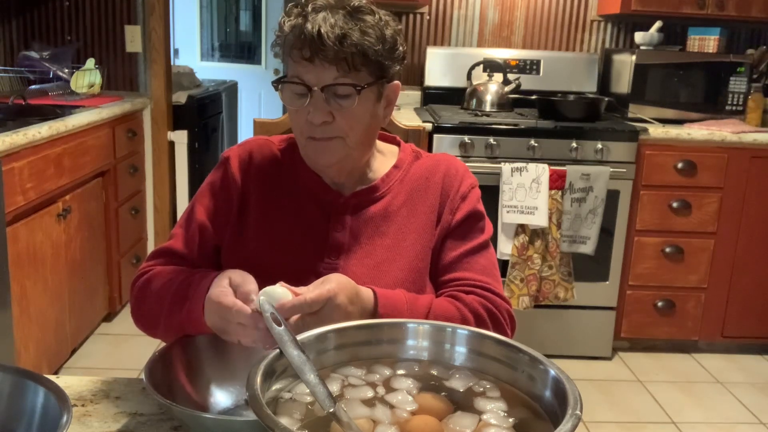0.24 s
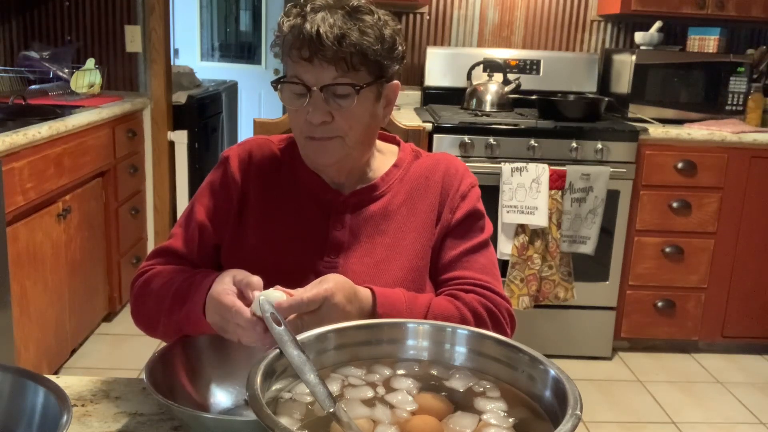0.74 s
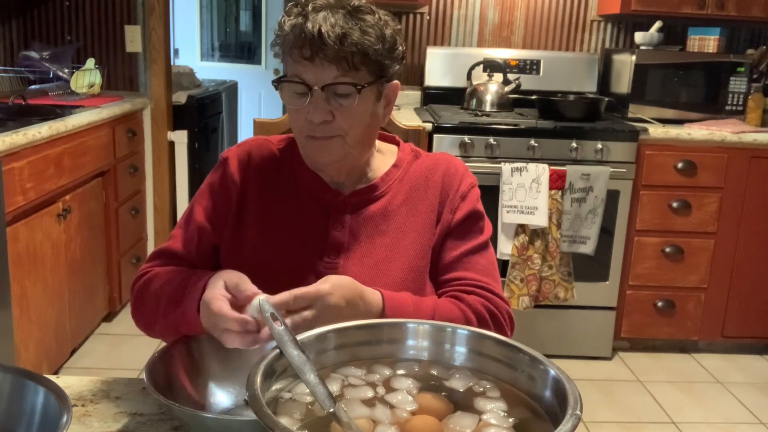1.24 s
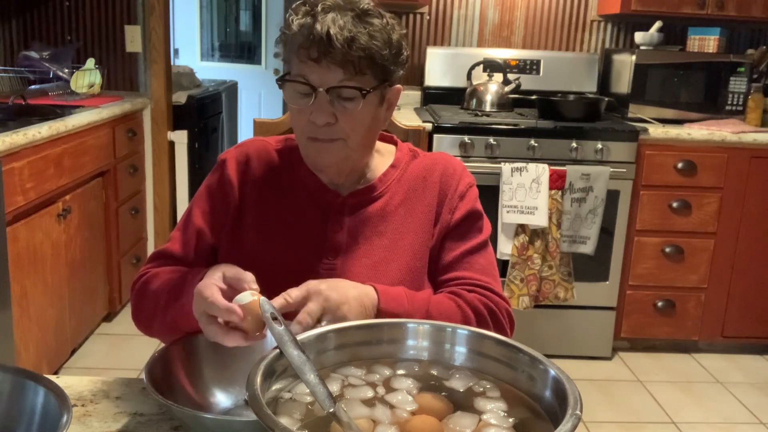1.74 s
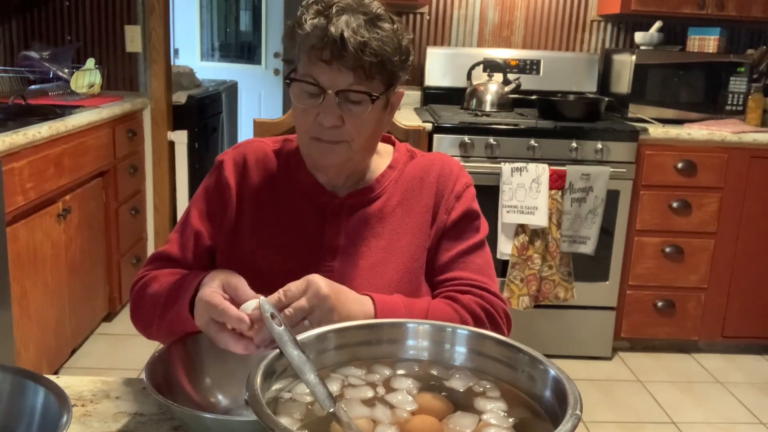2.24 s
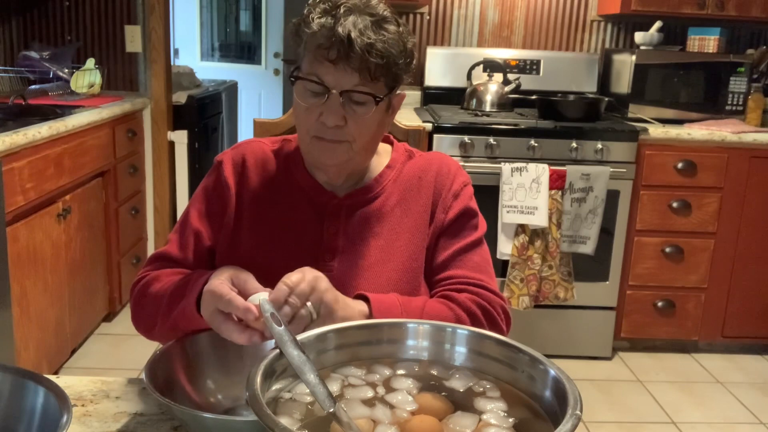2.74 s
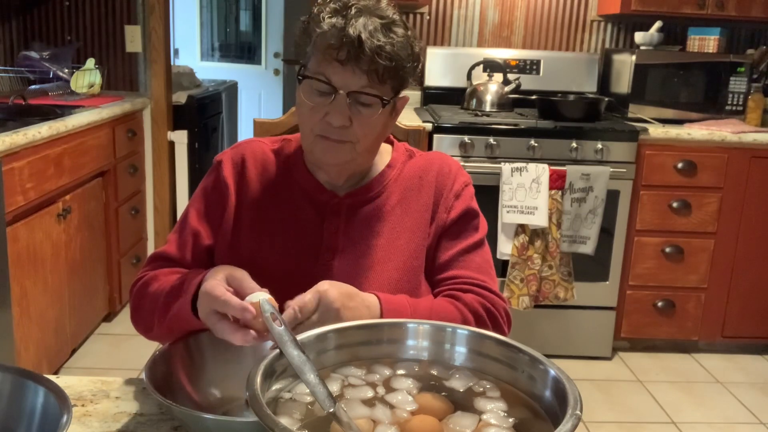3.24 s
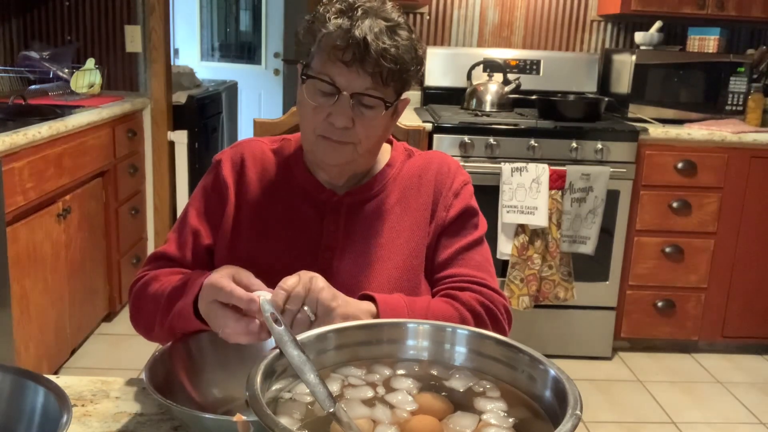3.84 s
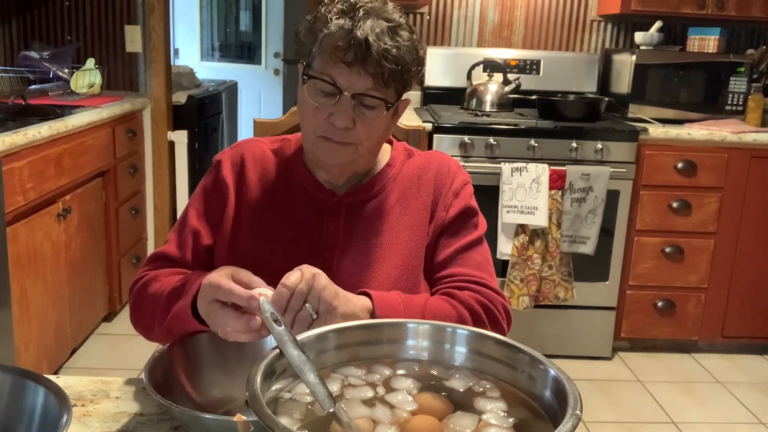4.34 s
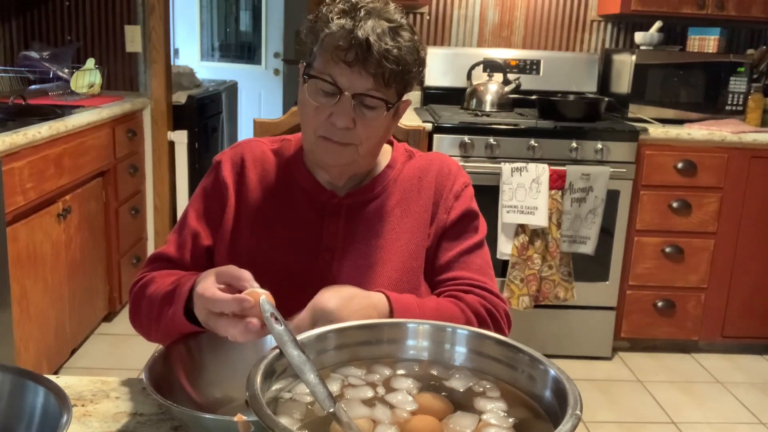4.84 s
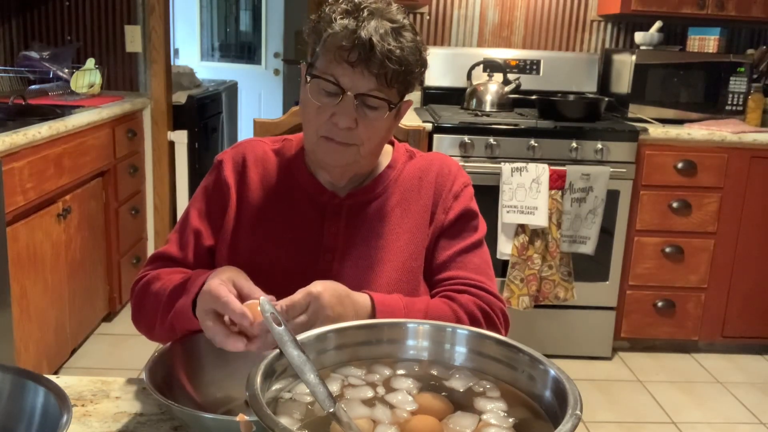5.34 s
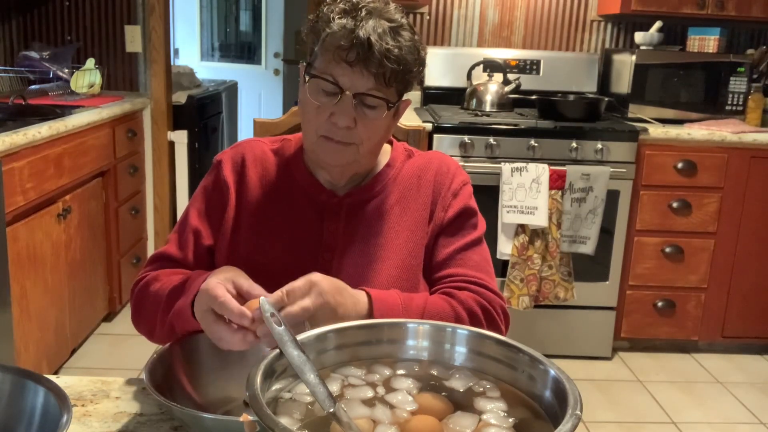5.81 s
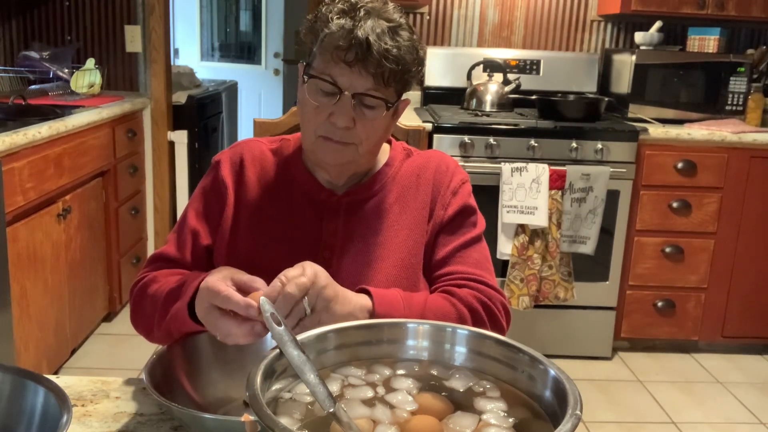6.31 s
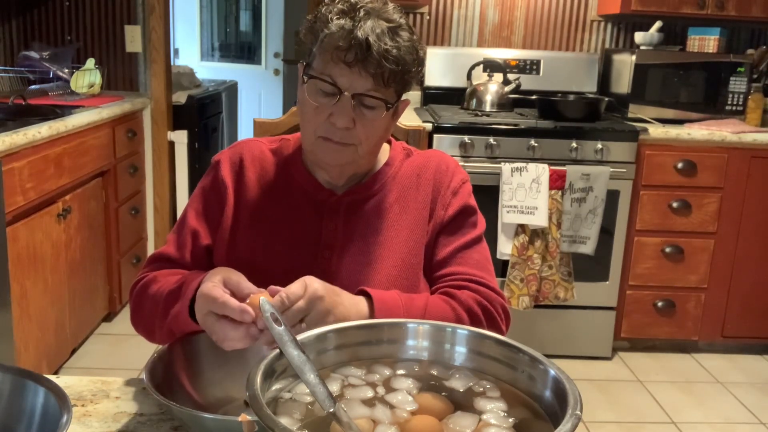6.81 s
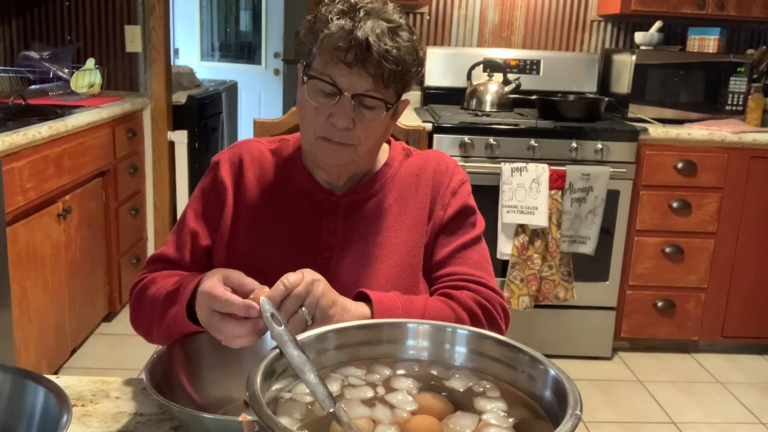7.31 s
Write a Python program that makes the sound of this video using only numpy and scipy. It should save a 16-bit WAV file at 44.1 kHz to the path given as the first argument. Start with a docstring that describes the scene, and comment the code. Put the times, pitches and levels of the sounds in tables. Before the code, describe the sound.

A steady low hum and soft fan rush fill a tiled kitchen. Nearby, fingers break and peel eggshell, giving short crisp snaps, gritty crumbles and a barely audible wet rub. The strongest double crack comes early, bright clinks follow before the middle, then a crackling cluster and one hard snap. Dull little bowl knocks appear between them, and the ending is a busy run of light ticks. Close stereo pickup, short room reverberation.

```python
"""The shell of a hard-boiled egg cracks and peels under the fingers, over steel bowls on a kitchen table.
Each snap is a short run of tiny fractures, an impulsive source that excites the modes of a shell flake.
Shell also crumbles, its membrane ticks, a thumb rubs the wet egg and large plates of shell ring briefly.
Knocks excite a bowl's damped modes; midway come bright clinks, strong short partials and faint lingering ones.
A tiled kitchen reverberates, over the wavering tones of an appliance and the low rush of a fan."""
import sys
import numpy as np
from scipy import signal
from scipy.fft import rfft, irfft, next_fast_len
from scipy.io import wavfile
from scipy.ndimage import uniform_filter1d

SR = 44100
rng = np.random.default_rng(int(sys.argv[2]) if len(sys.argv) > 2 else 0)


def generate_wav(sig):
    """Save sig (samples, or channels by samples) to the path in sys.argv[1] as 16-bit PCM at SR."""
    pcm = np.round(np.clip(np.atleast_2d(sig).T, -1, 1) * 32767).astype(np.int16)
    wavfile.write(sys.argv[1], SR, pcm)


N = 333837

# Shell snaps: [t/s, energy over 1 ms/dB, energy decay time of the tear/s, flake pitch f/Hz,
# flake ring level/dB, egg body level/dB, treble tilt/dB per octave]
SNAPS = [(0.152, -43.5, 0.00064, 8200, 10, -4, 2), (0.203, -26.5, 0.0038, 6150, -9, -3.5, 10.5),
         (0.436, -46, 0.019, 11500, 1, -20, 4), (0.7602, -37, 0.0015, 5000, 2, -12, -12),
         (0.7672, -37, 0.00059, 4260, 7, -7, -17), (0.772, -34.5, 0.009, 5200, 6, -8, -16),
         (0.7873, -29.5, 0.004, 5200, 0, -9, -10.5), (0.7943, -33.5, 0.0016, 6600, 14, -8, -3),
         (0.801, -38, 0.0012, 6700, 3, -12, 2), (1.085, -39, 0.0075, 9550, -3, -16.5, -3.5),
         (1.466, -43.5, 0.0013, 7950, 6, -0.5, 10), (1.7809, -27, 0.0012, 3250, 16, -8, 2),
         (1.7811, -21, 0.0023, 6600, -8, -15, -5.5), (1.8342, -21.5, 0.0022, 6700, -5, -12, -4),
         (2.094, -62.5, 0.002, 6500, -4, -20, -19.5), (2.45, -48, 0.0042, 6540, -11, -11, -12),
         (2.6005, -33, 0.0015, 4900, 5, -6, -21), (2.61, -37, 0.0047, 2300, 0, -17, -5),
         (2.7468, -27.5, 0.0009, 9600, -2, -18.5, -4), (2.7474, -31, .002, 5830, -1.5, -20, -3),
         (2.776, -48, 0.0018, 9600, -2, -4, 2), (3.3169, -38, 0.004, 7080, -11, -17, -16),
         (3.3518, -30.5, 0.0034, 7300, -15, -20, -14.5), (3.8032, -31.5, 0.0023, 6000, -17, -15, -2.5),
         (4.077, -53, 0.0013, 10100, 2.5, -6, -12), (4.137, -33.5, 0.0011, 5030, 7.5, -13, 6.5),
         (4.1515, -43, 0.0013, 5000, 15, 2, -14), (4.365, -36.5, 0.00067, 4400, 7, 3.5, -2),
         (4.373, -44, 0.0016, 2000, 7, -5, -13), (4.386, -44, 0.0019, 3370, 10, -8, -17),
         (4.395, -50, 0.00093, 3300, 6, -6, -12), (4.4347, -34, 0.0016, 5260, 9, -10, -16),
         (4.4345, -33, .001, 8920, 9, -20, 4), (4.4398, -41, .0008, 5400, 12, -12, 1),
         (4.4465, -43, .001, 5370, 10, -10, -1), (4.524, -35, 0.0016, 5760, -7, -15.5, -4),
         (4.524, -35, 0.0018, 9300, 7, -21, 12), (4.5308, -43.5, 0.0019, 9350, -3, -11, -4),
         (4.545, -48, .003, 12500, -6, -8, 4.5), (5.0096, -17.5, 0.0078, 7290, -15, -24.5, -5.5),
         (5.825, -42, 0.0034, 8630, -14, -23, -6.5), (6.044, -37, 0.00098, 6420, -18, -27, -18.5),
         (6.1523, -48, 0.0021, 6660, -10, -21, -22.5), (6.2134, -38, 0.0035, 9600, -3, -5, -4.5),
         (6.224, -47.5, 0.0053, 2600, 12, -14, -8), (6.6303, -53.5, 0.0021, 11550, 7.5, -12, -13.5),
         (6.8288, -60.5, .001, 7540, -10, -8, 9), (6.8533, -41, 0.0015, 10010, 21, -15.5, 0),
         (6.929, -39.5, 0.0039, 8660, 9, -20, -11), (6.952, -49.5, 0.0018, 4600, -4, -19, -16),
         (7.0366, -48, 0.004, 5500, -11, -16, 4), (7.047, -48, .004, 5500, -13, -21, 3),
         (7.074, -50, .001, 5500, -6, -7, 4), (7.0824, -43, 0.0048, 8600, 5, -16, -8),
         (7.1, -33, 0.00078, 12000, -3, -18, 10), (7.1369, -45, .0015, 6000, -8, -15, 9),
         (7.164, -42, 0.0036, 5500, -9, -15, 7), (7.176, -40, 0.0082, 11900, 4, -19, -8),
         (7.186, -39.5, 0.0079, 5110, 5.5, -6, 6.5), (7.335, -43.5, 0.005, 9030, 13, -1, 0),
         (7.4242, -58.5, .0015, 9890, -2, -14, 1), (7.4706, -44, 0.0027, 5000, -3, -6, 3),
         (7.4856, -35.5, 0.0025, 5050, 18, -7, -6.5)]
FLAKE_DAMPING = 0.18  # width of a flake's modes as a share of their pitch


def amp(db):
    """Level to amplitude ratio: 20 dB for each factor of ten."""
    return 10 ** (np.asarray(db) / 20)


def read(points, hz):
    """Linear interpolation of a tabulated spectrum on a logarithmic frequency axis."""
    f, value = np.transpose(points)
    return np.interp(np.log(hz + 1), np.log(f + 1), value)


def unit(x):
    """Normalization to unit energy, the sum of squares."""
    return x / np.sqrt(np.sum(x ** 2) + 1e-20)


def add(mix, s, sound):
    """Superposition: a sound adds linearly to the mix from time s."""
    part = mix[max(round(s * SR), 0):][:len(sound)]
    part += sound[:len(part)]


def causal(gain):
    """Minimum phase: the Hilbert transform of log gain gives a response that rings only after the blow."""
    both_sides = np.r_[gain, gain[-2:0:-1]]
    log_gain = np.log(np.maximum(both_sides, 1e-4))
    return np.fft.ifft(np.exp(np.conj(signal.hilbert(log_gain)))).real


def shell():
    """Brittle fracture: strain swells, then a tear excites the flake; returns straight and thrown sound."""
    strain_s, strain_db = 0.0011, -15  # build-up time, energy against the snap
    near, thrown = np.zeros((2, N))
    one_ms = np.sqrt(SR / 1000)
    for s, db, length, pitch_hz, ring_db, body_db, tilt_db in SNAPS:
        ring = flake(pitch_hz, damping_of(db), ring_db, body_db, tilt_db)
        strain = tear(strain_s)[::-1]  # a dying run reversed in time swells
        strain_start = s - len(strain) / SR
        for start, run, part_db in [(strain_start, strain, strain_db), (s, tear(length), 0)]:
            sound = amp(db + part_db) * one_ms * unit(np.convolve(run, ring))
            add(near, start, sound)
            add(thrown, start, sound * amp(cupped_db(s)))
    return near, thrown


def tear(length, fractures_per_s=7000, first_db=3, spread_db=4, clump_db=3.5, clump_s=0.001,
         evenness=0.45, order=160, size=2600):
    """Random impulse train: a break sets off dying, clumped fractures, partly whitened to excite all pitches."""
    chance, strength, sign = rng.random((3, size))
    t = np.arange(size) / SR
    clumps = np.interp(t / clump_s, np.arange(size), rng.standard_normal(size))
    fractures = (chance < fractures_per_s / SR) * np.sign(sign - 0.5)
    run = fractures * amp(spread_db * (2 * strength + 2) + clump_db * clumps)
    run[0] = amp(first_db)
    run = run * np.exp(-t / (2 * max(length, 1e-4)))
    power = uniform_filter1d(abs(rfft(unit(run))) ** 2, size=21) + 1e-3
    whitener = causal(power ** (-evenness / 2))[:order]
    return signal.fftconvolve(run, whitener)[:size]


def flake(pitch_hz, damping, ring_db, body_db, tilt_db, second=1.9, second_db=-3, third=2.3, third_db=-5,
          edge=0.63, body_hz=5000, low_hz=900, tilt_hz=7000, size=1024):
    """Modal resonance: three bending modes, little radiation below the first, and the egg's dull body."""
    hz = np.fft.rfftfreq(size, 1 / SR) + 1
    ratio = hz / pitch_hz
    treble = amp(tilt_db * np.log2(np.maximum(hz / tilt_hz, 1))) ** 2

    def mode(k, db):
        """Resonance curve: power response at k times the pitch."""
        return (amp(ring_db + db) / (1 + ((ratio / k - 1) / damping) ** 2)) ** 2

    upper = mode(second, second_db) + mode(third, third_db)
    modes = mode(1, 0) + upper * np.minimum(treble, 1)  # a soft break hardly wakes the upper modes
    crack = treble / (1 + ratio ** -12)
    radiates = 1 / (1 + (edge / ratio) ** 24)
    body = amp(body_db) ** 2 / (1 + (hz / body_hz) ** 4) / (1 + (low_hz / hz) ** 4)
    return causal(np.sqrt((modes + crack) * radiates + body))


def damping_of(db, firm_db=-34, halving_db=21):
    """Damping: a snap above firm_db frees its flake, and the modes narrow by half every halving_db."""
    return FLAKE_DAMPING * 2 ** (-max(db - firm_db, 0) / halving_db)


def cupped_db(s):
    """Shielding: hands cupping the egg send more of its sound round by the room."""
    # Course of the cupping: [t/s, room against straight sound level/dB]
    cupping = [(.2, -6), (1.8, -4), (2.6, -4.5), (2.75, 2.5), (3.35, 1.5), (3.8, 1.5), (4.14, -3), (4.4, 1),
               (4.55, -1.5), (6, -3), (7.3, -9), (7.5, -3)]
    return np.interp(s, *np.transpose(cupping))


def crumbs(per_s=170, tear_s=0.0006, scatter_db=3, scatter_octaves=0.21, swell_db=6, ring_db=3,
           body_db=-14, tilt_db=-4, room_db=1):
    """Repeated small fracture: flakes break off unevenly along each pull; returns straight and thrown sound."""
    # The thumb pulls strips of shell away: [start t/s, end t/s, typical crumb energy at the end over 1 ms/dB,
    # median crumb pitch f/Hz]; an end ahead of the start gives one crumb between the two
    pulls = [(0.168, 0.19, -47, 8150), (0.735, 0.75, -46.5, 4440), (0.949, 1.01, -63, 10400),
             (1.421, 1.54, -70, 10600), (1.772, 1.896, -42.5, 3160), (2.457, 2.48, -45, 2700),
             (2.588, 2.56, -49, 4217), (4.4, 4.432, -53, 4200), (4.504, 4.519, -46.5, 9400),
             (6.933, 6.8, -56, 4500), (7.071, 6.34, -47.5, 10430), (7.43, 7.6, -49.5, 9470),
             (7.48, 7, -46, 4870)]
    near, thrown = np.zeros((2, N))
    one_ms = np.sqrt(SR / 1000)
    for start, end, db, pitch_hz in pulls:
        count = max(round((end - start) * per_s), 1)
        for k in range(count):
            along = (k + rng.random()) / count
            loud, small = rng.standard_normal(2)
            s = start + along * (end - start)
            crumb_hz = pitch_hz * 2 ** (scatter_octaves * small)
            ring = flake(crumb_hz, FLAKE_DAMPING, ring_db, body_db, tilt_db)
            crumb_db = db + scatter_db * loud + swell_db * (along - 1)  # harder towards the end
            crumb = amp(crumb_db) * one_ms * unit(np.convolve(tear(tear_s), ring))
            add(near, s, crumb)
            add(thrown, s, crumb * amp(cupped_db(s) + room_db))
    return near, thrown


def plates(tick_db=-22, tick_s=0.001, tick_hz=7000):
    """Free vibration: large plates of shell spring free and ring briefly, each in its own modes."""
    # Plates: [t/s, level/dB, modes as (f/Hz, relative level/dB, t60/s)]
    pieces = [(0.2035, -52, [(4000, -3, .04), (6000, 3, .04)]), (1.781, -32, [(1500, -9, .02),
              (2912, -9, .11), (3060, -1, .035), (3230, 3, .018), (3410, 2, .035), (4950, 2, .014),
              (5140, 4, .018), (5380, 0, .014), (6250, -2, .035), (6400, 0, .05), (6800, 2, .018)]),
              (1.835, -41, [(900, -2, .035), (1720, -1, .025), (2020, 1, .03), (2680, -1, .05),
              (3050, -3, .05), (6370, 3, .04)]), (4.435, -45, [(5250, 0, .04), (8900, 8, .06)]),
              (4.5315, -45, [(13300, -2, .03), (14100, 0, .03)]), (4.5455, -47, [(12900, -2, .05),
              (13250, 0, .06)]), (5.011, -33, [(5410, 0, .04), (5620, -2, .025), (5790, -2, .035),
              (6580, 0, .03), (6930, 1, .04), (7040, 0, .06), (8450, 5, .04), (12470, -12, .05),
              (13360, -10, .07)])]
    return sum(struck([(s, db)], modes, tick_db, tick_s, tick_hz, uneven_db=2.5) for s, db, modes in pieces)


def membrane(level_db=-64, ticks_per_s=450, lead_s=0.01, spread_db=4):
    """Random point process: faint ticks of the membrane letting go crowd round snaps, where the thumb presses."""
    t = np.arange(N) / SR
    coarse_t = t[::64]
    nearest_snap = np.min([abs(coarse_t - row[0]) for row in SNAPS], axis=0)
    pressure = np.exp(-nearest_snap / lead_s)
    ticking = rng.random(N) < np.interp(t, coarse_t, pressure) * ticks_per_s / SR
    sizes = amp(spread_db * np.minimum(rng.exponential(1, N), 4)) * rng.choice([-1, 1], N)
    ticks = ticking * sizes * np.interp(t, coarse_t, np.sqrt(pressure))
    ring = unit(flake(6200, 0.15, -2, -18.5, 0))
    return amp(level_db) * signal.oaconvolve(ticks, ring)[:N]


def rub(width_hz=400, grain=0.38, grain_s=0.0048, level_db=-2):
    """Stick-slip friction: skin on wet egg gives a grainy, narrow-band squeak that swells and fades."""
    # Strokes of the thumb: [start t/s, length/s, relative level/dB, pitch f/Hz]
    strokes = [(1.58, 0.21, -86, 6500), (2.11, 0.18, -80.5, 2950), (2.14, 0.056, -76, 6750),
               (2.355, 0.14, -81.5, 3293)]
    out, t = np.zeros(N), np.arange(SR // 2) / SR
    for s, length, db, pitch_hz in strokes:
        slips = np.exp(grain * np.interp(t / grain_s, np.arange(len(t)), rng.standard_normal(len(t))))
        band = signal.butter(2, [pitch_hz - width_hz / 2, pitch_hz + width_hz / 2], "band", fs=SR)
        noise = signal.lfilter(*band, slips * rng.standard_normal(len(t)))
        squeak = np.sqrt(len(t)) * unit(noise)  # rms 1
        stroke = np.sin(np.pi * np.minimum(t / length, 1))
        add(out, s, amp(db + level_db) * stroke * squeak)
    return out


def struck(hits, partials, tick_db, tick_s, tick_hz, uneven_db, contact_s=0.00025):
    """Additive impact: a scratch of contact plus decaying partials that swell in contact and vary with each hit."""
    out, t = np.zeros(N), np.arange(SR * 3 // 4) / SR
    tick_band = signal.butter(1, [700, tick_hz], "band", fs=SR)
    for s, db in hits:
        ring = np.zeros(len(t))
        for hz, partial_db, t60 in partials:
            vary, phase = rng.standard_normal(2)
            envelope = amp(partial_db + uneven_db * vary - 60 * t / t60)
            ring += envelope * np.sin(2 * np.pi * (hz * t + phase))
        ring *= 1 - np.exp(-t / contact_s)
        tick = signal.lfilter(*tick_band, rng.standard_normal(len(t))) * np.exp(-t / tick_s)
        add(out, s, amp(db) * (ring + amp(tick_db) * tick))
    return out


def drops(tick_s=0.0037, spot_db=7, spot_octaves=0.17, away_db=-9):
    """Point excitation: the landing spot decides which bowl modes speak, and a soft touch misses high ones."""
    # Bits of shell and fingers knocking the bowl: [t/s, level/dB, scratch of contact relative level/dB,
    # f/Hz that the landing spot brings out, f/Hz above which a soft touch fades]
    knocks = [(0.4337, -57, 6, 1550, 6000), (.442, -50, 4, 920, 3500), (.466, -59, 2, 1500, 3500),
              (1.2336, -71, 11, 1200, 4000), (3.5429, -49.5, 6, 1300, 2800), (3.552, -54, 2, 1580, 3000),
              (3.695, -56, 0, 1000, 2000), (4.9665, -49.5, 4, 1200, 3200), (5.009, -55, -6, 1100, 2000),
              (5.259, -58, -1, 1230, 1800), (5.4373, -63, 5, 1510, 2500), (6.577, -46, -2, 860, 2200)]
    # Modes of the damped bowl: [f/Hz, relative level/dB, t60/s]
    bowl_modes = [(815, -1, 0.07), (925, -7, 0.12), (1068, -9, 0.05), (1197, -2, 0.09), (1290, -7, 0.04),
                  (1394, -8, 0.047), (1580, -6, 0.11), (1985, -10, 0.07), (2330, -10, 0.1), (2730, -8, .08)]
    out = np.zeros(N)
    for s, db, tick_db, spot_hz, soft_hz in knocks:
        modes = []
        for hz, mode_db, t60 in bowl_modes:
            near_spot = np.exp(-(np.log2(hz / spot_hz) / spot_octaves) ** 2)
            softness_db = -10 * np.log10(1 + (hz / soft_hz) ** 4)
            modes.append((hz, mode_db + away_db + spot_db * near_spot + softness_db, t60))
        out += struck([(s, db)], modes, tick_db, tick_s, soft_hz, uneven_db=1)
    return out


def clinks(level_db=-2.5):
    """Sum of decaying partials: bright clinks of strong short partials and faint thin tones that linger."""
    # Clinks: [t/s, relative level/dB]
    hits = [(3.3172, -55), (3.3525, -41.5), (3.544, -73), (3.697, -78)]
    # Partials of the clinks, strong short ones and faint thin ones that linger: [f/Hz, relative level/dB, t60/s]
    partials = [(1137, -10.5, 0.17), (1550, -14, .08), (1940, -18.5, .2), (2320, -18.5, .2),
                (2890, 1.5, 0.19), (3020, -3, 0.18), (3055, -4.5, 0.11), (3311, -16, .2), (3634, -18, .42),
                (3919, -22, .46), (4183, -23, 0.68), (4424, -24, .6), (4400, -21, .7), (4780, -21, .25),
                (5050, -24, 0.9), (5548, -22, 1.0), (5557, -27, 0.86), (5712, -23, 0.99),
                (6022, -22.5, 1.0), (6033, -24, .8), (6183, -23, 0.86), (6347, -8, 0.18), (6519, 6, 0.12),
                (6520, 6, 0.12), (6750, -4, .17), (6840, -8, .25), (7063, -9, 0.31), (7200, -3, 0.43),
                (7450, -5, .1), (7784, -11, 0.22), (8446, 6.5, 0.2), (8710, 1, 0.14), (8950, 10, .13),
                (9230, 0.5, .14), (9900, 1, 0.15), (10160, 1, 0.16)]
    return amp(level_db) * struck(hits, partials, tick_db=-5, tick_s=0.002, tick_hz=2500, uneven_db=2)


def kitchen(x, ceiling_s=0.0117, ceiling=0.36, count=3, sway_s=1.3):
    """Room reflection: a clear ceiling bounce, and tails that take turns as the hands sway."""
    turn = np.arange(N) / SR / sway_s
    wet = np.zeros((2, N))
    for k in range(count):
        share = np.sqrt(2 / count) * np.cos(np.pi * (turn + k / count))  # squares of the shares sum to 1
        wet += signal.oaconvolve((x * share)[None], tail(), axes=1)[:, :N]
    return wet + ceiling * np.pad(x, (round(ceiling_s * SR), 0))[:N]


def tail(build_s=0.0024, size=22050):
    """Reverberant decay: reflections grow dense in uneven clumps and die at a rate set by frequency."""
    # Kitchen reverberation: [f/Hz, t60/s]
    decay = [(800, 0.19), (2800, 0.32), (6500, 0.26), (10000, 0.22), (15000, 0.19)]
    t = np.arange(size) / SR
    present = rng.random((2, size)) < np.minimum(0.04 + 5 * t, 1)
    taps = rng.standard_normal((2, size)) * present * (1 - np.exp(-t / build_s))
    hz, when, z = signal.stft(taps, SR, nperseg=256)
    clumps = uniform_filter1d(rng.standard_normal(z.shape[1:]), size=24, axis=0)
    clumps_db = 2.5 * clumps / clumps.std()
    decay_db = -60 * when / read(decay, hz)[:, None]
    pair = signal.istft(z * amp(clumps_db + decay_db), SR, nperseg=256)[1]
    return diffuse(np.array([unit(side) for side in pair]), keep_power=True)


def diffuse(pair, keep_power=False):
    """Diffuse-field coherence: two unrelated signals become mid and side of close microphone ports."""
    # Width of diffuse sound: [f/Hz, side minus mid level/dB]
    side_table = [(60, -10.5), (200, -12.5), (380, -0.5), (700, 5), (1300, 2), (2400, -0.5), (5000, -2),
                  (7000, -3.5), (8800, -39), (11000, -19), (14000, -24)]
    count = pair.shape[1]
    size = next_fast_len(count + 4096)
    mid, side = rfft(pair, size)
    width = amp(read(side_table, np.fft.rfftfreq(size, 1 / SR)))
    scale = 1 / np.sqrt(1 + width ** 2) if keep_power else 1
    return irfft(scale * np.array([mid + width * side, mid - width * side]), size)[:, :count]


def hum(waver_hz=2.5, count=16):
    """Narrow-band modulation: motor and mains tones waver in strength and phase."""
    # Appliance tones: [f/Hz, rms level at the microphones/dB, waver from 0 to 1, lag of the right side/rad]
    tones = [(58.6, -56.5, .06, 0.084), (119.4, -58, 0.19, 0.25), (192.7, -62, 0.7, 1.2),
             (215.4, -59.5, 0.2, 0.49), (287.8, -66, 0.9, 0.22), (360.5, -66.5, 0.4, 0.49),
             (409.5, -72, 1, 1.6), (480, -68, 0.97, 1.2), (716.4, -76.5, 1, 0.58), (824, -76, 1, 4.2)]
    t, slow_t = np.arange(N) / SR, np.linspace(0, N / SR, 600)
    out = np.zeros((2, N))
    for hz, db, waver, lag in tones:
        rates, starts = waver_hz * rng.standard_normal((count, 1)), rng.random((count, 1))
        drift = np.exp(2j * np.pi * (rates * slow_t + starts)).sum(0) / np.sqrt(count)
        strength = np.interp(t, slow_t, np.sqrt(1 - waver ** 2) + waver * drift)
        tone = strength * np.exp(2j * np.pi * (hz * t + rng.random()))
        out += np.sqrt(2) * amp(db) * np.array([tone.real, (tone * np.exp(-1j * lag)).real])
    return out


def air():
    """Stationary filtered noise: the steady low rush of a fan and room air."""
    # Noise spectrum: [f/Hz, mid level/dB per Hz]
    spectrum = [(25, -102), (55, -87), (90, -89), (160, -79.5), (210, -78.5), (300, -85), (470, -87),
                (620, -94.5), (820, -96.5), (1400, -105), (2600, -111), (3900, -123), (8000, -126),
                (13500, -125), (15500, -132)]
    size = next_fast_len(N)
    colour = amp(read(spectrum, np.fft.rfftfreq(size, 1 / SR))) * np.sqrt(SR / 2)
    noise = rfft(rng.standard_normal((2, size)))
    return diffuse(irfft(noise * colour, size)[:, :N])


def scene(bowl_room_db=-1, clink_room_db=-9, plate_room_db=-5):
    """Superposition: direct sound of egg, bowl and clinks, their reverberation, hum and air."""
    snaps_near, snaps_thrown = shell()
    crumbs_near, crumbs_thrown = crumbs()
    fingers = membrane() + rub()
    bowl, pieces, clinking = drops(), plates(), clinks()
    into_room = snaps_thrown + crumbs_thrown + fingers
    into_room += amp(bowl_room_db) * bowl + amp(clink_room_db) * clinking + amp(plate_room_db) * pieces
    direct = snaps_near + crumbs_near + fingers + bowl + clinking + pieces
    return direct + kitchen(into_room) + air() + hum()


def record(dry, edge_hz=16200):
    """Linear filtering: microphone colour, balance, treble lag of the right port, and a band limit."""
    # Microphone colour: [f/Hz, level/dB]
    colour = [(2000, -0.5), (4200, 0.5), (5400, 1), (9000, 0.5), (12000, 1), (14300, -1), (15400, -9.5),
              (16100, -20)]
    # Microphone balance: [f/Hz, left minus right level/dB]
    balance = [(60, -2.5), (130, -0.5), (290, 2.5), (640, -1.5), (1410, -2), (3100, -1), (6820, -0.5),
               (15000, 0.0)]
    # Treble lag of the right microphone port: [f/Hz, phase/rad]
    port_lag = [(3300, 0), (6000, 1.1), (7000, 1.6), (8000, 2.6), (9000, 3.14), (10000, 3.85), (11000, 4.6),
                (12000, 5.25), (13000, 5.95), (14200, 6.25)]
    size = next_fast_len(N + 4096)
    hz = np.fft.rfftfreq(size, 1 / SR)
    left, right = rfft(dry, size) * amp(read(colour, hz))
    lean = amp(read(balance, hz) / 2)
    lagged = right / lean * np.exp(-1j * read(port_lag, hz))
    ports = irfft(np.array([left * lean, lagged]), size)[:, :N]
    low_pass = signal.firwin(511, edge_hz, window=("kaiser", 9), fs=SR)
    return signal.oaconvolve(ports, low_pass[None], "same")


dry = scene()
out = record(dry)
generate_wav(out)
```